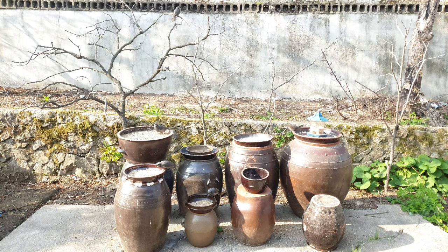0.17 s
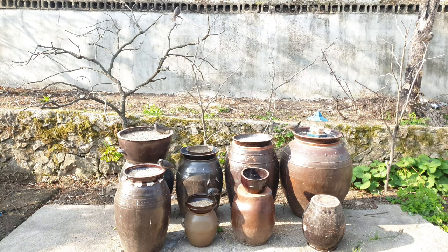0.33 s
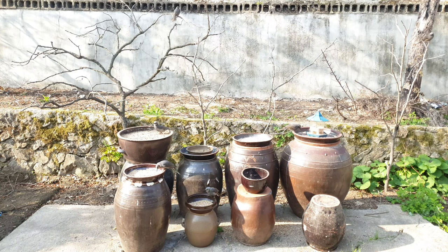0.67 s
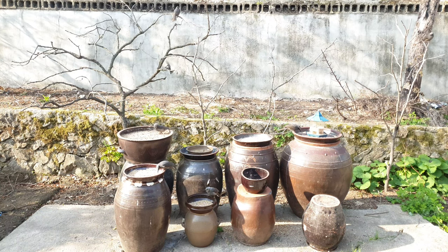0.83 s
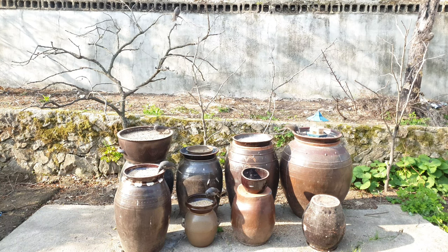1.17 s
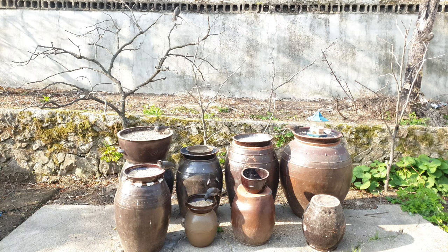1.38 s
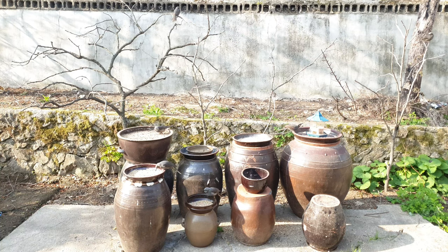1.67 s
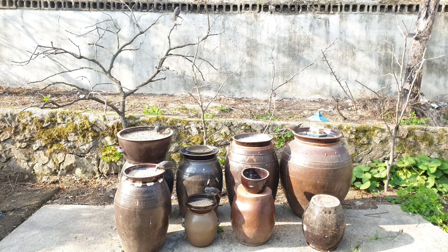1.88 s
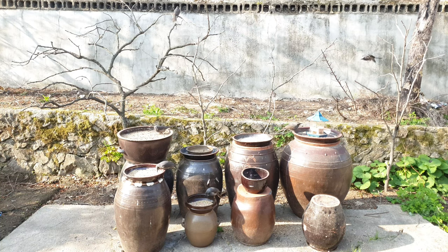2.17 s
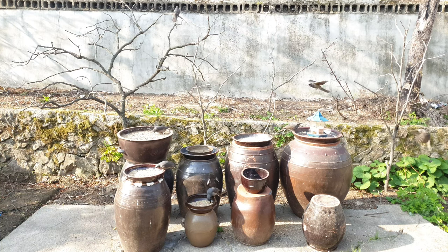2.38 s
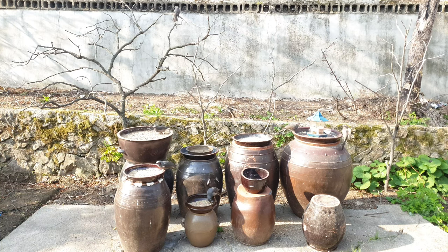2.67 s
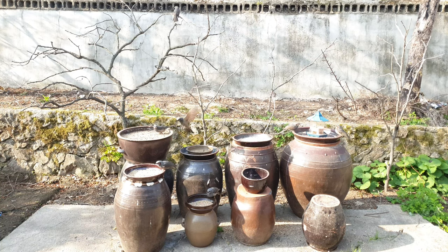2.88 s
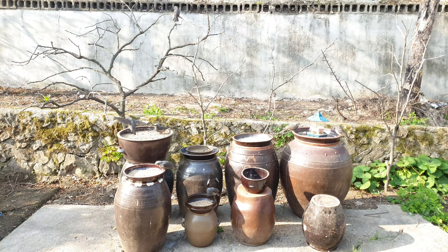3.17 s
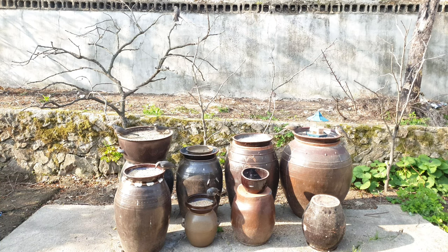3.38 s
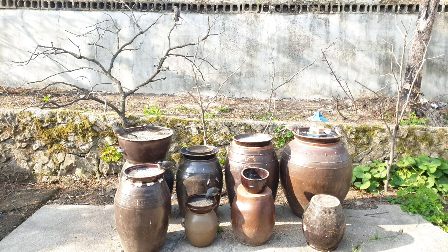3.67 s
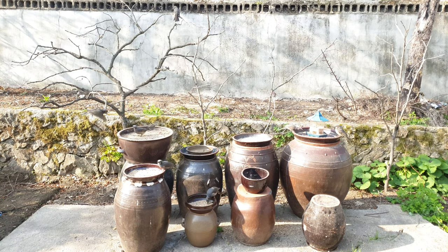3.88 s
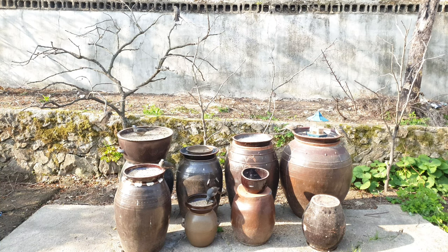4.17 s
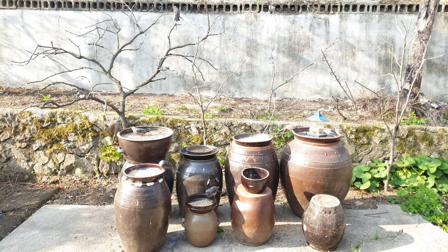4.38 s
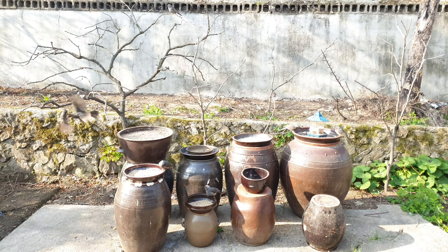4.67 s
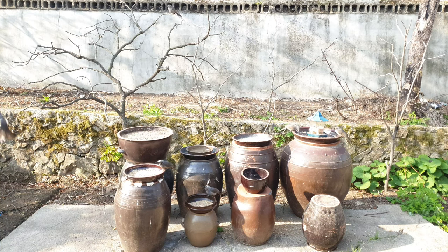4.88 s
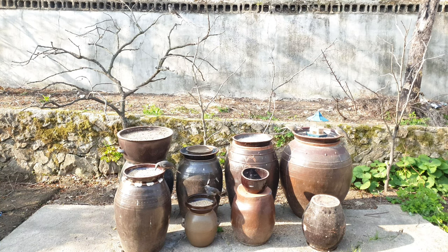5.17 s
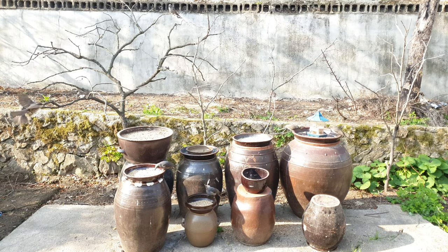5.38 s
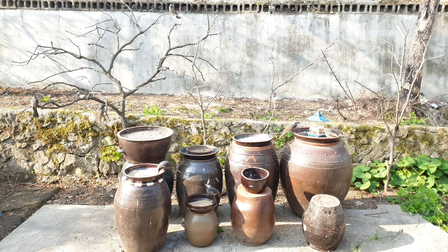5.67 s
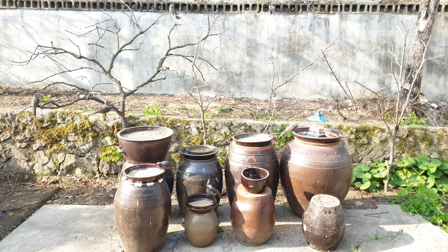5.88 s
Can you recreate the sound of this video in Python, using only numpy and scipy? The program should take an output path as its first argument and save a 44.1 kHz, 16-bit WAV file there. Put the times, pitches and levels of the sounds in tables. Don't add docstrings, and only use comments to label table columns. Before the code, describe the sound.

Small birds chirp and flutter around clay jars in a walled yard, with claw ticks, a buzzy close trill and low far traffic rumble.

```python
import sys
import numpy as np
from scipy import signal
from scipy.fft import rfft, irfft, next_fast_len
from scipy.io import wavfile
from scipy.ndimage import uniform_filter1d, map_coordinates

SR = 44100
rng = np.random.default_rng(int(sys.argv[2]) if len(sys.argv) > 2 else 0)


def natural_amplitude(level_db):
    exponent = np.asarray(level_db, float) / 20
    return 10 ** exponent


def output_pcm(signal):
    pcm = np.clip(np.atleast_2d(signal).T, -1, 1) * 32767
    wavfile.write(sys.argv[1], SR, np.round(pcm).astype(np.int16))


N = 265834
TOP_HZ = 15800
WING_LAG = 19


def unit(x):
    return x / np.sqrt(np.mean(x ** 2) + 1e-20)


def along(points, hz):
    f, level = np.transpose(points)
    return np.interp(np.log(hz + 1), np.log(f + 1), level, left=-120, right=-120)


def curves(rows):
    s, *cols = np.transpose(rows)
    return [np.interp(np.arange(N) / SR, s, col) for col in cols]


def wobble(rate, count=N):
    knots = rng.standard_normal(int(count * rate / SR) + 4)
    return map_coordinates(knots, [np.arange(count) * rate / SR])


def filtered(x, response):
    m = next_fast_len(x.shape[-1] + 8192)
    spectrum = rfft(x, m) * response(np.fft.rfftfreq(m, 1 / SR))
    return irfft(spectrum, m)[..., :x.shape[-1]]


def below_top(hz):
    return hz < TOP_HZ


def tinted(burst, spectrum, low_db):
    return filtered(burst, lambda hz: natural_amplitude(along(spectrum, hz) + low_db / (1 + (hz / 5800) ** 6)))


def rush(spectrum, alike, patchy_db, lag=0):
    z = signal.stft(rng.standard_normal((2, N)), nperseg=512)[2]
    patches = uniform_filter1d(rng.standard_normal(z.shape[1:]), 6, 0)
    patches = unit(uniform_filter1d(patches, 10, 1))
    pair = signal.istft(z * natural_amplitude(patchy_db * patches), nperseg=512)[1][:, :N]
    pair = filtered(pair, lambda hz: natural_amplitude(along(spectrum, hz)))
    turn = np.arccos(np.clip(alike, -1, 1)) / 2
    mid, side = pair * [[np.cos(turn)], [np.sin(turn)]]
    return unit(np.array([np.roll(mid + side, lag), mid - side]))


def swells(s, rise, fall, db, calm_db, steep):
    t = np.arange(N) / SR - s[:, None]
    before = -t / np.clip(rise, .004, 3)[:, None]
    after = t / np.clip(fall, .004, 3)[:, None]
    away = np.where(t < 0, before, after)
    power = natural_amplitude(2 * (db[:, None] - 10 * steep * np.minimum(away, 30))).sum(0)
    return np.sqrt(natural_amplitude(2 * calm_db) + power)


# (frequency [Hz], time to fall 60 dB [s])
WALL_RING = [(300, 0.071), (3000, 0.33), (6000, 0.26), (12000, 0.28)]
# (delay [s], level [dB])
FIRST_ECHOES = [(.0024, -9), (.0066, -4), (.0155, -12), (.024, -15)]


def add(mix, s, sound, pan_db, wet_db, dry_db, echo_db, lag):
    hz, t, z = signal.stft(rng.standard_normal((2, SR // 3)), SR, nperseg=256)
    t60 = np.interp(hz, *np.transpose(WALL_RING))[:, None]
    fading = z * natural_amplitude(-60 * t / t60) * below_top(hz)[:, None]
    tail = signal.istft(fading, SR, nperseg=256)[1]
    room = np.pad(natural_amplitude(wet_db) * tail / np.linalg.norm(tail[0]), ((0, 0), (300, 0)))
    arrival = np.clip([round(lag), -round(lag)], 0, None)
    room[[0, 1], arrival] += natural_amplitude(dry_db)
    for delay, db in FIRST_ECHOES:
        room[[0, 1], round(delay * SR) + arrival] += natural_amplitude(db + echo_db)
    heard = signal.fftconvolve(sound[None], room, axes=1) * natural_amplitude([[pan_db / 2], [-pan_db / 2]])
    part = mix[:, round(s * SR):][:, :heard.shape[1]]
    part += heard[:, :part.shape[1]]


def voice(shape, length, hz, second_db, third_db, jitter, shake_db, shake_rate, rasp):
    n = round(length * SR)
    share, *cols = np.transpose(shape)
    bends = [np.interp(np.arange(n) / n, share, col) for col in cols]
    ratio, db, *half_db = (uniform_filter1d(bend, size=90) for bend in bends)
    pitch = hz * ratio * (1 + jitter * wobble(496.4, count=n))
    phase = 2 * np.pi * np.cumsum(pitch) / SR
    upper = np.sin(3 * phase) + natural_amplitude(-15) * np.sin(4 * phase)
    overtones = natural_amplitude(second_db) * np.sin(2 * phase) + natural_amplitude(third_db) * upper
    tone = np.sin(phase) + natural_amplitude(0.88 * db) * overtones
    half_pitch = natural_amplitude(half_db).sum(0) * 2 * np.cos(phase / 2)
    tone = tone * (1 + half_pitch + rasp * wobble(2500, count=n))
    effort = natural_amplitude(db + shake_db * wobble(shake_rate, count=n))
    return filtered(np.sqrt(2) * effort * tone, below_top)


def sing(calls, shape, throat, place):
    mix = np.zeros((2, N))
    for s, length, hz, db, pan_db in calls:
        call = voice(shape, length, hz, **throat)
        add(mix, s, natural_amplitude(db) * call, pan_db, echo_db=-11.0, **place)
    return mix


# (frequency [Hz], level per Hz [dB])
DRONE_SPECTRUM = [(20, -40), (35, -12), (60, -7), (85, -9.5), (104, 1), (118, -9), (135, -9.5),
                  (170, -46.5)]
# (frequency [Hz], level per Hz [dB])
ROAR_SPECTRUM = [(90, -55.5), (120, -2.5), (150, 4), (190, -1), (232, -11), (270, -10), (295, -6.5),
                 (340, -18), (389, -18), (426, -27.5), (520, -33.5), (680, -50)]
# (time [s], roar level [dB], drone level [dB])
TRAFFIC_FLOW = [(0, -37.5, -45.5), (.5, -36, -45.5), (.85, -42, -46), (1.2, -35, -39), (1.65, -39, -45),
                (2.1, -38, -40), (2.4, -37.5, -44), (3.1, -33.5, -39), (3.5, -34, -37), (4.0, -33.5, -35.5),
                (4.3, -38, -43.5), (4.8, -35.5, -34), (5.0, -39.5, -41.5), (5.28, -36.5, -37.5),
                (5.37, -40, -44.5), (5.45, -39, -34.5), (5.7, -38.5, -40), (6.03, -30.5, -32.5)]


def traffic():
    roar_db, drone_db = curves(TRAFFIC_FLOW)
    drone = natural_amplitude(drone_db) * rush(DRONE_SPECTRUM, alike=0.99, patchy_db=0.83)
    roar = natural_amplitude(roar_db - 1.5) * rush(ROAR_SPECTRUM, alike=0.91, patchy_db=1.64)
    return (drone + roar) * natural_amplitude([[-1.3], [1.3]])


# (frequency [Hz], level per Hz [dB])
LEAF_SPECTRUM = [(1500, -38), (2800, -3.5), (5000, -8.5), (7000, -9.5), (8500, -12), (11000, -6),
                 (13000, -4.5), (15500, -9.5), (15750, 1), (15900, -71)]
# (time [s], rise [s], settle [s], level [dB])
TWIG_STIRS = [
    (0, .01, 1, -76.5),
    (.55, 0.27, 0.26, -85),
    (1.07, 0.098, 0.14, -73),
    (2.95, 0.95, 0.45, -77),
    (4.25, 0.46, 0.33, -84),
    (4.82, 0.32, 0.32, -66.5),
    (5.199, 0.27, 0.29, -69.5),
]


def leaves():
    stir = swells(*np.transpose(TWIG_STIRS), calm_db=-87.5, steep=0.86)
    flicker = natural_amplitude(2.5 + 0.79 * wobble(25))
    return stir * flicker * rush(LEAF_SPECTRUM, alike=0.07, patchy_db=1.2) * natural_amplitude([[4.5], [1.5]])


# (frequency [Hz], level per Hz [dB])
PUSH_SPECTRUM = [(300, -30.5), (420, 0.5), (700, -0.5), (1100, -4.5), (1600, -16), (2500, -38)]
# (frequency [Hz], level per Hz [dB])
FEATHER_SPECTRUM = [(700, -22.5), (1100, -2), (1600, -2), (2400, -5), (3500, -13), (5500, -31), (9000, -46),
                    (15000, -54.5)]
# (frequency [Hz], width [Hz], level [dB])
JAR_MODES = [(388.5, 10, 8.5), (558, 7.8, -3.5), (644, 11, -10.5), (731, 23, 3.5)]
# (time nearest [s], approach [s], leave [s], push level [dB], feather over push [dB])
FLIGHTS = [(0, .01, 0.0036, -43.5, -10), (.01, .01, 0.2, -60, -6.5), (.69, 0.11, 0.16, -64.5, -11),
           (1.36, 0.15, 0.25, -58, -8), (1.86, 0.12, 0.35, -65.5, -12), (2.54, 0.23, 0.66, -53, -10),
           (3.07, 0.18, 0.38, -61, -0.5), (3.45, 0.31, 0.58, -62, 0.5), (3.72, 0.35, 1, -54, -7),
           (3.98, 0.024, 0.031, -43.5, -4.5), (4.02, 0.33, 0.3, -53.5, 5), (4.08, 0.064, 0.049, -46.5, -6),
           (4.26, 0.058, 0.35, -56, -2), (4.6, 0.032, 0.096, -56, 7.5), (4.732, 0.1, 0.11, -51.5, -1.5),
           (4.88, 0.094, 0.21, -53.5, -3), (5.28, .07, 0.27, -56, -2.5)]


def jar_response(f):
    return sum(natural_amplitude(db) * 1j * f * w / (c * c - f * f + 1j * f * w) for c, w, db in JAR_MODES)


def wings():
    s, come, go, db, bright_db = np.transpose(FLIGHTS)
    near = swells(s, come, go, db, calm_db=-68.5, steep=1.0)
    hiss = swells(s, come, go, db + bright_db, calm_db=-84.5, steep=1.7)
    beat = wobble(22.17)
    air = rush(PUSH_SPECTRUM, alike=0.72, patchy_db=1.5, lag=WING_LAG)
    hum_gain = (near / natural_amplitude(-49)) ** 0.95 * natural_amplitude(5.5)
    push = air + hum_gain * filtered(air, jar_response)
    feather = rush(FEATHER_SPECTRUM, alike=0.37, patchy_db=1.56, lag=WING_LAG)
    swish = near * natural_amplitude(-1.5 + 0.37 * beat) * push + hiss * natural_amplitude(1.3 * beat) * feather
    return swish * natural_amplitude([[4], [1.8]])


# (frequency [Hz], level per Hz [dB])
VANE_SPECTRUM = [(500, -33), (1500, 0.5), (4000, 1.5), (7500, 1.5), (11000, 7), (15600, -1), (15900, -61)]
# (time [s], peak level [dB], low part [dB], left over right [dB])
WING_STROKES = [(0.0094, -54, 2, 12), (0.0428, -50.5, 2.5, 13.5), (0.077, -64, -11, 4),
                (0.092, -55, -1, 10), (0.12, -60, -6, 10), (0.154, -58.5, 2, 8), (0.197, -60.5, 5.5, 14),
                (0.242, -63, -13, 17), (0.29, -66, -4, 15), (0.376, -62, -3, 14), (0.4155, -63, -11, 16),
                (0.671, -58, -2, 12.5), (0.815, -66, -18, 8), (1.306, -61.5, 2, 10), (2.2594, -80, 9, -5),
                (2.955, -63, -4, 10), (3.3, -66, 1, 4), (3.4257, -67, -3, 3.5), (4.029, -61.5, 11, 8),
                (4.242, -65, 7, 5), (4.536, -44, 16, 5), (4.719, -50, 0, 1), (4.847, -41, 6.5, 7),
                (4.875, -44, 1, -1), (4.922, -41, 6, 6.5), (4.951, -50, -10, -1), (5.008, -52, 7, 7)]


def flaps():
    mix, t = np.zeros((2, N)), np.arange(SR // 10) / SR
    stroke = (1 - np.exp(-t / 0.0025)) * np.exp(-(t / 0.013) ** 3)
    for s, db, low_db, pan_db in WING_STROKES:
        crackle = natural_amplitude(3 * wobble(1500, count=len(t)))
        puff = stroke * crackle * rng.standard_normal(len(t))
        puff = natural_amplitude(db - 11) * tinted(puff, VANE_SPECTRUM, low_db)
        add(mix, s, puff, pan_db, wet_db=0.5, dry_db=3.5, echo_db=-14.0, lag=-10.0)
    return mix


# (share of length, pitch ratio, level [dB])
FLAT_SHAPE = [(0, .97, -4), (.25, 1.02, -1), (.7, 0.92, -12.5), (1, .97, -12.5)]
# (time [s], length [s], top pitch [Hz], level [dB],
# left over right [dB])
FAR_CALLS = [(0.044, 0.058, 2720, -73, 12), (0.197, 0.054, 2880, -73.5, 12), (0.196, 0.052, 5770, -62, 1),
             (0.326, 0.069, 4670, -68, 4), (0.38, 0.071, 2970, -71.5, 7.5), (1.312, 0.07, 3960, -74, 11),
             (1.399, 0.03, 5900, -68, 1), (1.43, 0.037, 4550, -69, 3), (1.43, 0.054, 3760, -78, 5),
             (1.5, 0.071, 4400, -77, 6), (1.51, 0.066, 3650, -78, 6), (1.617, 0.076, 4400, -72.5, 5),
             (1.624, 0.091, 5100, -75, 2), (1.651, 0.056, 3380, -73.5, 13), (1.708, 0.057, 6090, -69.5, 3),
             (0.173, 0.033, 4140, -68, 1), (2.327, 0.074, 4310, -76, 8), (2.325, 0.11, 2980, -74, 10),
             (2.786, 0.057, 3720, -70.5, 11), (3.035, 0.089, 4290, -70.5, 13), (3.01, 0.058, 5320, -67, 4),
             (3.875, 0.032, 5700, -57, 0), (4.037, 0.044, 4540, -66, 2), (4.153, 0.06, 3850, -69, 1),
             (4.523, 0.054, 4540, -49, 2), (4.434, 0.097, 2360, -57, 3), (5.645, 0.09, 4870, -70.5, 2)]


def far_birds():
    throat = dict(second_db=-24, third_db=-38.5, jitter=0.048, shake_db=2.5, shake_rate=400, rasp=0.45)
    return sing(FAR_CALLS, FLAT_SHAPE, throat, dict(wet_db=0.5, dry_db=-2.0, lag=3))


# (share of length, pitch ratio, level [dB])
DART_SHAPE = [(0, .85, -17), (.15, 1.11, 2.5), (1, 0.818, -6.5)]
# (time [s], length [s], top pitch [Hz], level [dB], left over right [dB])
DART_CALLS = [
    (0.483, 0.027, 5720, -62, 4),
    (0.494, 0.035, 5200, -66.5, 5),
]


def darts():
    throat = dict(second_db=-15, third_db=-29.5, jitter=0.06, shake_db=5.0, shake_rate=390, rasp=0.17)
    return sing(DART_CALLS, DART_SHAPE, throat, dict(wet_db=-2.5, dry_db=-1, lag=-8.5))


# (share of length, pitch ratio, level [dB])
SEEP_SHAPE = [(0, .74, -17.5), (.16, .94, -6), (.27, 1, -1.5), (.45, 0.93, 0.5), (.68, 0.865, 7),
              (.73, 0.76, -1), (.82, 0.79, 7), (1, 0.75, -20)]
# (time [s], length [s], top pitch [Hz], level [dB], left over right [dB])
SEEP_CALLS = [
    (0.863, .097, 7180, -52.5, 5),
    (1.04, .097, 7270, -51, 5),
]


def seeps():
    throat = dict(second_db=-17, third_db=-31.5, jitter=0.014, shake_db=3.0, shake_rate=198, rasp=0.052)
    return sing(SEEP_CALLS, SEEP_SHAPE, throat, dict(wet_db=-8.5, dry_db=0.0, lag=-5.0))


# (share of length, pitch ratio, level [dB], half-pitch level [dB])
LEVEL_SHAPE = [(0, .75, -30, -40), (0.13, .85, -7, -23), (.36, 0.98, 4, -28), (.85, .92, -1.5, -36),
               (1, 0.85, -8, -26)]
# (share of length, pitch ratio, level [dB], half-pitch level [dB])
CHIRP_SHAPE = [(0, .77, -28, -30), (0.12, .85, -8, -39), (.24, .95, -1, -41), (.38, 1, 0, -38),
               (0.58, .94, 2, -33), (.72, .87, 4, -21), (.84, .81, -4, -16), (1, 0.72, -30, -21)]
# (share of length, pitch ratio, level [dB])
FLICK_SHAPE = [(0, 0.496, -7), (.5, 0.66, -1), (1, 1.06, 0)]
# (time [s], top pitch [Hz], level [dB], second overtone [dB], third overtone [dB])
SPARROW_CHIRPS = [
    (2.113, 3065, -57, -2, -8),
    (2.69, 3256, -50, -7.5, -19.5),
    (3.092, 3257, -54, -7.5, -31),
    (4.329, 3075, -47, -10, -24),
    (5.296, 3214, -64, -4, -21),
    (5.693, 3104, -47.5, -9.5, -17),
]


def sparrow():
    mix = np.zeros((2, N))
    perch = dict(pan_db=6.5, wet_db=-4.5, dry_db=0.4, echo_db=-5.5, lag=18.2)
    shapes = [LEVEL_SHAPE] + [CHIRP_SHAPE] * len(SPARROW_CHIRPS)
    for shape, (s, hz, db, second_db, third_db) in zip(shapes, SPARROW_CHIRPS):
        chirp = voice(shape, .094, hz, second_db, third_db, jitter=0.016, shake_db=3, shake_rate=170, rasp=.11)
        flick = voice(FLICK_SHAPE, 0.018, hz, -28, -40, jitter=.01, shake_db=1.1, shake_rate=150, rasp=.05)
        add(mix, s, natural_amplitude(db) * chirp, **perch)
        add(mix, s - 0.0071, natural_amplitude(db - 12) * flick, **perch)
    return mix


# (frequency [Hz], level per Hz [dB])
RIM_SPECTRUM = [(500, -8), (1500, -1), (4000, 8), (7000, 5), (10500, 1), (14000, -3), (16500, -12),
                (16850, -70)]
# (time [s], peak level [dB], low part [dB], left over right [dB], scrape level [dB])
CLAW_TICKS = [(3.8014, -37.5, 3, 4.5, -22), (3.8677, -35, 2, 2.5, -23), (4.5942, -37, -2, 3, -18),
              (4.5966, -37, -5, 3, -16), (4.6263, -24, -2, 4, -21), (4.6352, -36, -2, 4, -14),
              (4.6832, -41, -6, 2, -16), (4.6861, -29.5, -2, 1.5, -19), (4.6952, -37, -6, 2, -16),
              (4.7225, -44, -6, 4, -12), (4.7256, -28.5, -5, 5, -19), (4.7296, -36, -6, 4, -15)]


def claws():
    mix, t = np.zeros((2, N)), np.arange(SR // 20) / SR
    for s, db, low_db, pan_db, scrape_db in CLAW_TICKS:
        grit = filtered(rng.standard_normal(len(t)), below_top)
        contact = natural_amplitude(scrape_db + 5.5 - 20 * t / 0.0062) * grit
        contact[24] += 1.2
        contact = natural_amplitude(db + 3.5) * tinted(contact, RIM_SPECTRUM, low_db)
        add(mix, s, contact, pan_db, wet_db=1.5, dry_db=5.5, echo_db=5, lag=-7)
    return mix


# (share of length, pitch ratio, level [dB], half-pitch level [dB])
RISING_SHAPE = [(0, 0.5, -16, -26), (.35, .7, 2, -14), (.55, .94, 4, -6), (.75, 1, 2, -10), (1, 1, -8, -19)]
# (time [s], length [s], top pitch [Hz], level [dB], left over right [dB])
RISING_CALLS = [
    (4.231, .05, 3350, -57, 5),
]


def rising_call():
    throat = dict(second_db=-6, third_db=-20.5, jitter=0.014, shake_db=3.0, shake_rate=196.7, rasp=.2)
    return sing(RISING_CALLS, RISING_SHAPE, throat, dict(wet_db=-3, dry_db=0, lag=-4.5))


# (share of length, pitch ratio, level [dB], half-pitch level [dB])
TRILL_SHAPE = [(0, .82, -22, -20), (.3, .85, -12, -17), (.45, .89, -6, -15), (.58, .93, 1, -15),
               (.7, .96, 1, -16), (.86, 0.97, -1, -22), (.95, 0.965, -10, -22), (1, 0.96, -28, -22)]
# (time [s], length [s], top pitch [Hz], level [dB], left over right [dB])
TRILL_CALLS = [
    (4.318, .21, 4703, -36.5, 4),
]


def trill():
    mix = np.zeros((2, N))
    for s, length, hz, db, pan_db in TRILL_CALLS:
        note = voice(TRILL_SHAPE, length, hz, second_db=-22, third_db=-42, jitter=0.03,
                     shake_db=3, shake_rate=140, rasp=0.3)
        pulse_hz = 165 * (1 + .12 * wobble(40, count=len(note)))
        chop = natural_amplitude(7 * np.sin(2 * np.pi * np.cumsum(pulse_hz) / SR))
        add(mix, s, natural_amplitude(db) * chop * note, pan_db, wet_db=-7.5, dry_db=-6.0, echo_db=-12, lag=-5)
    return mix


# (share of length, pitch ratio, level [dB], half-pitch level [dB])
FALLING_SHAPE = [(0, 1.15, -11, -20), (.15, 1.09, 2, -26), (.35, .97, 1.5, -29), (.6, .9, 0.5, -23),
                 (1, 0.59, -26, -13)]
# (time [s], length [s], top pitch [Hz], level [dB], left over right [dB])
FALLING_CALLS = [
    (4.525, 0.058, 2440, -41, 4.5),
]


def falling_call():
    throat = dict(second_db=-4.5, third_db=-9.5, jitter=0.028, shake_db=4, shake_rate=470, rasp=0.18)
    return sing(FALLING_CALLS, FALLING_SHAPE, throat, dict(wet_db=-6.0, dry_db=-3.0, lag=-4.5))


# (share of length, pitch ratio, level [dB])
GLIDE_SHAPE = [(0, .8, -6), (.5, .92, 0), (1, 1, -8)]
# (time [s], length [s], top pitch [Hz], level [dB], left over
# right [dB])
GLIDE_CALLS = [
    (5.202, .03, 8500, -64, 3),
    (5.19, .015, 5200, -67, 2),
]


def glides():
    throat = dict(second_db=-35, third_db=-49.5, jitter=.005, shake_db=.8, shake_rate=80, rasp=.01)
    return sing(GLIDE_CALLS, GLIDE_SHAPE, throat, dict(wet_db=-12, dry_db=0, lag=18))


# (share of length, pitch ratio, level [dB])
ARCH_SHAPE = [(0, .7, -16), (.2, .85, -7), (.42, .95, 0), (.68, 1, -1), (.8, .95, -5), (.9, .82, -9),
              (1, .6, -14)]
# (time [s], length [s], top pitch [Hz], level [dB], left over right [dB])
ARCH_CALLS = [
    (5.195, .108, 4855, -51.5, 3),
]


def arches():
    throat = dict(second_db=-34.5, third_db=-49, jitter=.003, shake_db=.6, shake_rate=80, rasp=.01)
    return sing(ARCH_CALLS, ARCH_SHAPE, throat, dict(wet_db=-13, dry_db=0, lag=18))


def scene():
    ground = traffic() + leaves()
    flight = wings() + flaps()
    early_calls = far_birds() + darts() + seeps() + sparrow()
    late_calls = rising_call() + trill() + falling_call() + glides() + arches()
    return ground + flight + early_calls + claws() + late_calls


def band_limit(x):
    return signal.sosfilt(signal.butter(12, 16840, fs=SR, output="sos"), x)


def record(dry):
    fade = np.clip((N - np.arange(N)) / (.004 * SR), .35, 1)
    return band_limit(dry * fade)


dry = scene()
out = record(dry)
output_pcm(out)
```